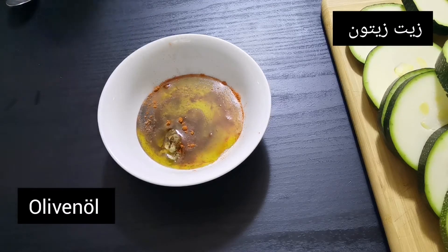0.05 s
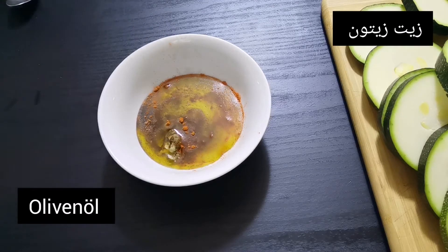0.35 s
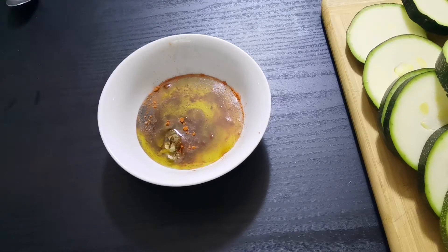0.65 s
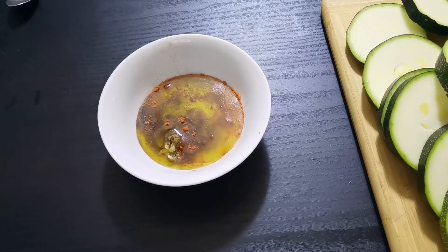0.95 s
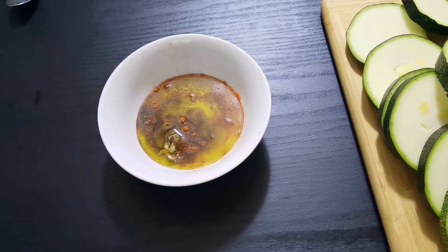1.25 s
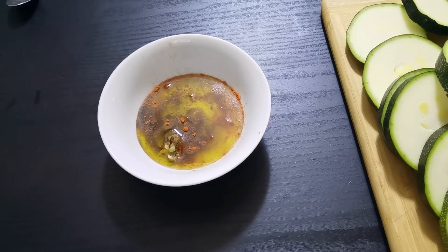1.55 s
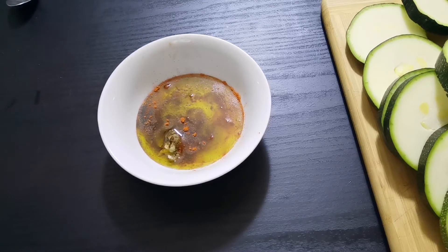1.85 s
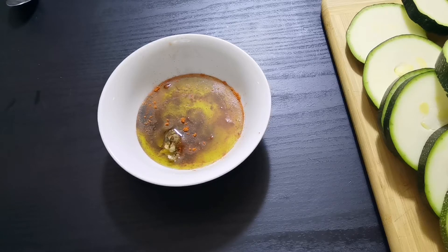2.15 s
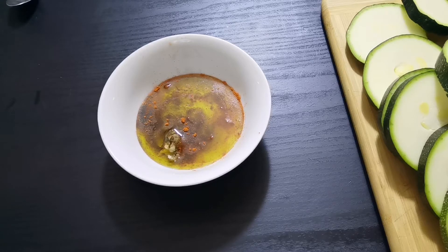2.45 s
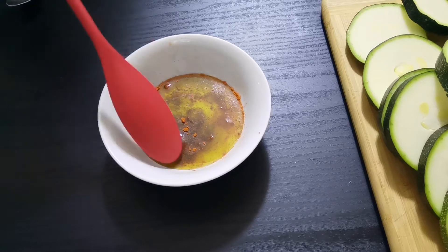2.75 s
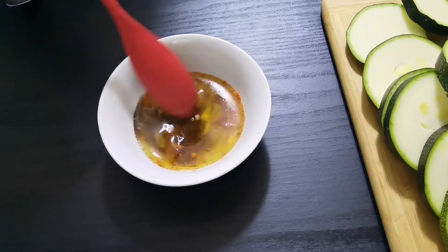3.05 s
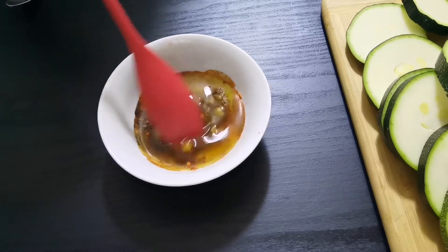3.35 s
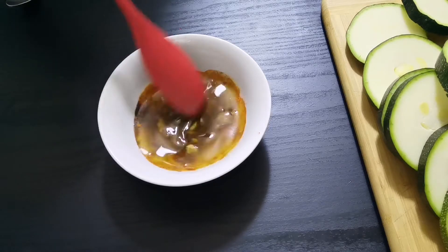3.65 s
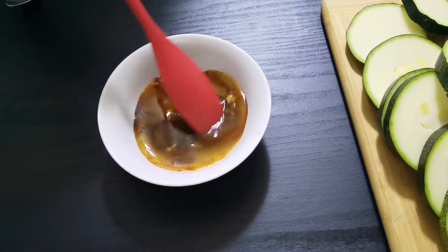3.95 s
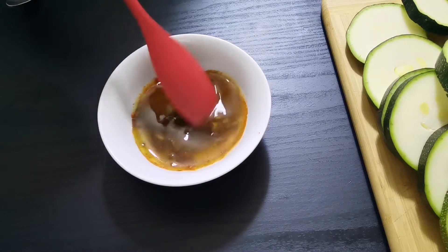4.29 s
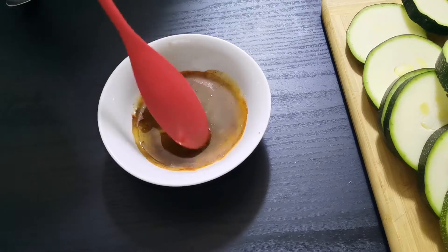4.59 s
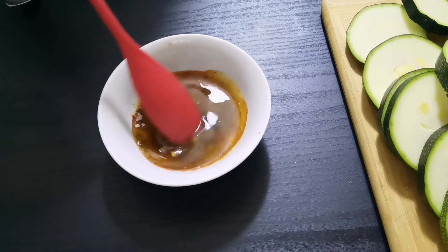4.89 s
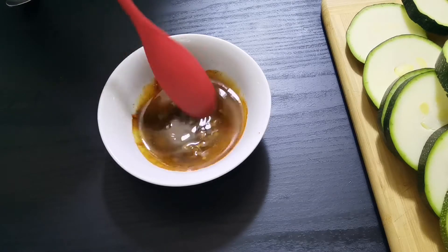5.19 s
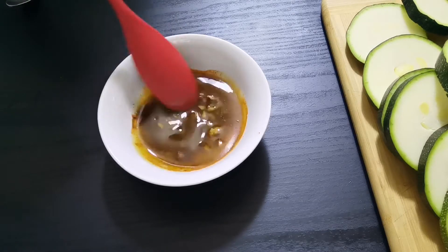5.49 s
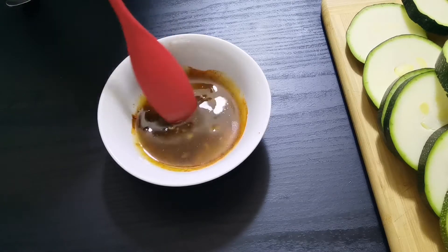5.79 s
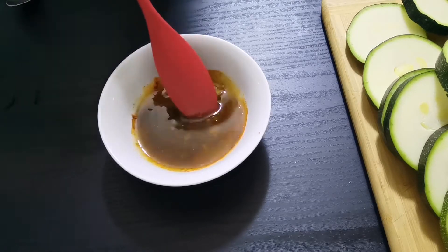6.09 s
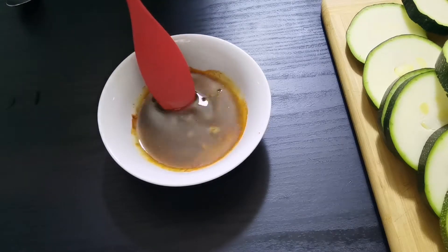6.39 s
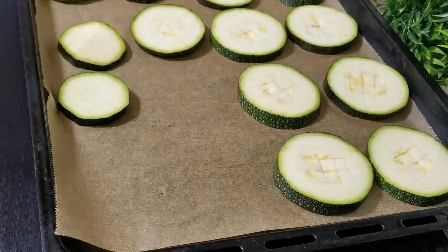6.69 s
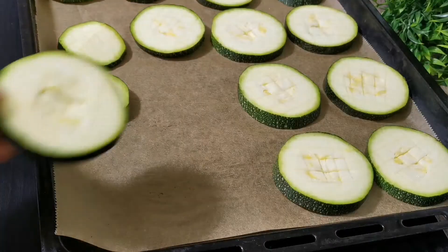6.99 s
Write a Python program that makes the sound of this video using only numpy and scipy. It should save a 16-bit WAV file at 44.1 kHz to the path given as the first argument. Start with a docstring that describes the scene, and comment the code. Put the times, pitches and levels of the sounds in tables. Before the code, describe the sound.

A plastic jar lid snaps and the jar thuds onto a wooden table, then a spatula stirs oil and spices in a ceramic bowl.

```python
"""A small, quiet kitchen, a stereo microphone close to a wooden table. First a spice jar's plastic lid
snaps shut. At 1.3 s the jar is set down and the table rings; at 1.8 s something is slid aside, sticking
and slipping. From 2.9 s to 6.4 s a silicone spatula stirs oil and spices in a ceramic bowl: grit scrapes
the glaze, air pockets smack and pop in the oil, and each push rumbles through the table. At 6.6 s the
sound drops out briefly and returns with a soft bump on the left."""
import sys
import numpy as np
from scipy import signal
from scipy.fft import rfft, irfft
from scipy.io import wavfile

SR = 44100
rng = np.random.default_rng(int(sys.argv[2]) if len(sys.argv) > 2 else 0)


def materialize(psi):
    """Save the field psi as 16-bit PCM at rate SR to the path in sys.argv[1].

    A 1-D psi becomes a single channel; in a 2-D psi each row is a channel.
    """
    bounded = np.clip(np.atleast_2d(psi).T, -1, 1)
    quanta = np.round(bounded * 32767).astype(np.int16)
    wavfile.write(sys.argv[1], SR, quanta)


N = 310148
T = np.arange(N) / SR
SHORT = T[:SR // 2]  # time axis of one short event


# strokes of the spatula: (start [s], length [s], push level [dB], scrape level [dB])
STROKES = [(2.86, 0.14, -60.5, -69.5), (3.08, 0.14, -54.5, -63.5), (3.345, 0.12, -54.5, -62.5),
           (3.515, 0.069, -57.5, -63.5), (3.635, .1, -59.5, -64.5), (3.8, 0.14, -56.5, -66.5),
           (3.95, .17, -52.5, -61.5), (4.155, .11, -51.5, -64), (4.295, 0.079, -50, -60),
           (4.415, 0.078, -54.5, -60), (4.712, 0.034, -52.5, -63.5), (4.835, 0.092, -50, -60),
           (4.96, 0.052, -56, -62), (5.07, 0.12, -53, -60.5), (5.205, 0.13, -47.5, -60.5),
           (5.385, 0.039, -47.5, -55), (5.465, 0.091, -52, -60.5), (5.575, 0.1, -53, -61.5),
           (5.69, 0.17, -51, -63), (5.865, 0.082, -58.5, -65.5), (5.99, .04, -65, -76),
           (6.05, .105, -54.5, -66.5), (6.175, 0.033, -57, -66), (6.24, .065, -51.5, -67.5),
           (6.34, 0.057, -55.5, -68.5)]
# the blade drags oil along between strokes: (start [s], stop [s], push level [dB], scrape level [dB])
DRAGS = [(2.87, 4.46, -65, -75), (4.72, 5.92, -59, -70), (6.06, 6.42, -64, -75.5)]


def spatula():
    """Strength of push, scrape and grit: over a light drag each stroke digs in, sags and lets go."""
    attack_s, sag_db_per_s = 0.021, 10
    push_release_s, scrape_release_s = 0.039, 0.026  # the oil moves on after the scrape has ended
    push, scrape = np.zeros(N), np.zeros(N)
    for start_s, stop_s, push_db, scrape_db in DRAGS:
        push += amp(push_db) * gesture(start_s, stop_s, attack_s, push_release_s)
        scrape += amp(scrape_db) * gesture(start_s, stop_s, attack_s, scrape_release_s)
    for s, length_s, push_db, scrape_db in STROKES:
        stop_s = s + length_s
        sag = amp(-sag_db_per_s * np.clip(T - s, 0, length_s))
        push = np.maximum(push, amp(push_db) * sag * gesture(s, stop_s, attack_s, push_release_s))
        scrape = np.maximum(scrape, amp(scrape_db) * sag * gesture(s, stop_s, attack_s, scrape_release_s))
    soaked = np.interp(T, [STROKES[0][0], 6.56], [0, 1]) ** 2.1
    grit = scrape * amp(-3.5 - 9.5 * soaked)  # the grit fades as the spices soak
    return push, scrape, grit


# bowl and table shaken by the blade: (frequency [Hz], level [dB])
PUSH_SPECTRUM = [(35, -61.5), (60, -29.5), (108, 3.5), (151, -3.5), (233, 1.5), (283, -10.5), (322, 3.5),
                 (355, -12), (413, -4.5), (460, -16), (710, -12.5), (800, -22.5), (1040, -44.5),
                 (1760, -120)]
# spices rasping on the glaze: (frequency [Hz], level [dB])
SCRAPE_SPECTRUM = [(290, -38.5), (500, -3.5), (719, -8), (868, -7), (1010, 1), (1140, -8.5), (1340, 3),
                   (1760, -21.5), (2060, 6), (2900, -9.5), (3180, -5.5), (6000, -48.5), (7800, -60),
                   (13200, -120)]
# the fizz of fine grit: (frequency [Hz], level [dB])
GRIT_SPECTRUM = [(2400, -23), (3800, -5), (4800, 1), (6200, -8), (8000, -2), (9300, -14), (11000, -9),
                 (13000, -25), (15500, -26)]


def stirring(push, scrape, grit):
    """Spices catch under the blade in spurts, the oil squelches, the drag shakes bowl and table."""
    spurts = amp(3.26 * walk(70))
    catches = grains(1100, 3.7) * spurts
    fine = grains(4000, 1.8) * spurts
    rumble = amp(-3) * push * unit(colour(grains(1500, 1.6) * spurts, PUSH_SPECTRUM))
    glugs = amp(-7) * squelch(push, per_s=40, low_hz=149.3, high_hz=373, cycles=2.4, spread_db=9.5)
    rasp = amp(1) * scrape * unit(bowl(colour(catches, SCRAPE_SPECTRUM)))
    pops = squelch(scrape, per_s=180, low_hz=1137, high_hz=3880, cycles=2.34, spread_db=13)
    fizz = amp(2) * grit * unit(bowl(colour(unit(catches) + 0.98 * unit(fine), GRIT_SPECTRUM)))
    hard_push = push * np.sqrt(push / amp(-51.5))  # from about this level on, thick oil plops loudly
    plops = amp(-4) * squelch(hard_push, per_s=90, low_hz=449, high_hz=1098, cycles=2.26, spread_db=9)
    return rumble + glugs + plops, rasp + amp(-2) * bowl(pops) + fizz


def squelch(level, per_s, low_hz, high_hz, cycles, spread_db):
    """Air pockets of many sizes open in the oil, as loud as the stirring is strong."""
    out = np.zeros(N)
    for when, pitch, strength, length in rng.random((int(per_s * N / SR), 4)):
        s = when * N / SR
        drive = level[int(s * SR)]
        if drive > 0:
            hz = low_hz * (high_hz / low_hz) ** pitch
            pocket = bubble(hz, cycles * (0.5 + length), rise=0.13, size=SR // 10)
            add(out, s, pocket, 20 * np.log10(drive) + spread_db * strength ** 2)
    return out


def bubble(hz, cycles, rise, size=len(SHORT)):
    """An air pocket rings for a few cycles and rises in pitch as it opens."""
    age = SHORT[:size] * hz / cycles
    glide = 1 + rise * (1 - np.exp(-age))
    return np.sin(2 * np.pi * hz * np.cumsum(glide) / SR) * np.exp(-age)


# loud smacks of oil off the blade: (time [s], level [dB], pitch [Hz], relative treble [dB])
SMACKS = [(2.9531, -49, 2150, -19), (2.9886, -45, 2200, -6), (3.1061, -37.5, 2100, -10),
          (3.1531, -37.5, 2270, -31), (3.1887, -41.5, 2120, -16), (3.242, -42, 2620, -26),
          (3.3645, -30.5, 2450, -7.5), (3.4171, -40, 2080, -19), (3.644, -39.5, 2140, -32),
          (3.715, -41.5, 2540, -19), (3.8334, -42, 2070, -14), (3.879, -38.5, 3420, -22),
          (3.963, -40, 2300, -30), (4.0326, -39.5, 2080, -28), (4.089, -39.5, 1920, -30),
          (4.2126, -41.5, 2230, -35), (4.3365, -38.5, 2040, -20), (4.4064, -36, 2090, -10),
          (4.7161, -27.5, 3080, -4), (4.8556, -34, 3220, -1.5), (4.8995, -35, 2050, -6),
          (5.0158, -38.5, 3200, -4.5), (5.0873, -36, 2090, -2), (5.1108, -32, 2100, -29),
          (5.2474, -32, 2010, -7), (5.3004, -38.5, 2090, -30), (5.4051, -38, 2000, 2),
          (5.4211, -34.5, 2070, -16), (5.8277, -38.5, 2160, -24), (6.0591, -48, 2790, -13.5),
          (6.182, -44, 2180, -11.5), (6.3175, -47, 2070, -9.5)]
# the tearing oil film: (frequency [Hz], level [dB])
TEAR_SPECTRUM = [(200, -26.5), (500, 10), (1000, -8), (2200, 5), (3400, 6), (4500, -8), (6500, -4.5),
                 (9000, -19), (15000, -35)]


def smacks(scrape):
    """The oil film tears with a crackle and the air pocket behind it rings."""
    out = np.zeros(N)
    for s, db, hz, treble_db in SMACKS + lesser_smacks(scrape):
        tear = crack(0.0053, share=0.39)
        film = unit(colour(tear, TEAR_SPECTRUM))
        pocket = 1.01 * unit(bubble(hz, cycles=5.9, rise=0.023))
        treble = amp(treble_db + 5.5) * unit(colour(tear, GRIT_SPECTRUM))
        add(out, s, bowl(film + pocket + treble), db)
    return out


def lesser_smacks(scrape, per_s=13, over_scrape_db=18, scatter_db=2.5, scatter_octaves=0.2):
    """Chance smacks that follow the strength of the scraping, as rows like those of SMACKS."""
    rows = []
    for when, strength, pitch in rng.uniform(-1, 1, (int(per_s * N / SR), 3)):
        i = int(abs(when) * (N - 1))
        if scrape[i] > 0:
            db = 20 * np.log10(scrape[i]) + over_scrape_db + scatter_db * strength
            rows.append((i / SR, db, 2206 * 2 ** (scatter_octaves * pitch), -17))
    return rows


# the blade squeezes oil out: (time [s], level [dB], half length [s])
SQUISHES = [(3.839, -53, 0.007), (3.886, -51, 0.007), (4.368, -58.5, .016), (4.742, -58.5, 0.018),
            (5.12, -42.5, 0.009), (5.244, -47, 0.013), (5.374, -49, 0.016), (5.652, -54.5, 0.018)]
# the crackle of squeezed oil: (frequency [Hz], level [dB])
SQUISH_SPECTRUM = [(600, -10), (1500, -5), (2200, -1.5), (3500, -2.5), (5000, -1), (8000, -5.5),
                   (11000, -14), (15000, -26)]


def squishes():
    """Oil squeezed under the blade bursts into a dense, bright crackle."""
    squeeze = sum(amp(db) * np.exp(-np.abs((T - s) / half_s) ** 0.98) for s, db, half_s in SQUISHES)
    bursts = grains(3000, 2.2) * amp(3.6 * walk(300))
    return squeeze * unit(bowl(colour(bursts, SQUISH_SPECTRUM)))


# resonances of the bowl: (frequency [Hz], width [Hz], level [dB])
BOWL_RESONANCES = [(994, 113, -2), (1333, 14, -1), (1568, 28, 4.5), (2008, 60, -3.5), (2640, 180, -5),
                   (3410, 210, -4), (7940, 200, -13)]


def bowl(x):
    """The ceramic bowl lifts its own resonances out of whatever touches it."""
    return x + sum(amp(db) * band(x, hz, width) for hz, width, db in BOWL_RESONANCES)


# the blade knocks on bare glaze: (time [s], level [dB])
TAPS = [(3.153, -71), (3.365, -61), (3.65, -55.5), (3.991, -54), (4.09, -56.5), (4.449, -66),
        (4.716, -53.5), (5.11, -49), (5.412, -61)]
# modes of the struck bowl: (frequency [Hz], level [dB], t60 [s])
BOWL_MODES = [(1333, -3.5, 0.2), (2060, -11.5, 0.2)]


def taps():
    """Each knock sounds the bowl's own note, damped by the oil in it."""
    out = np.zeros(N)
    for s, db in TAPS:
        add(out, s, above(ring(BOWL_MODES), 900), db)
    return out


def squeak():
    """The resting blade creeps on the glaze with a faint whistle."""
    whistle = band(band(rng.standard_normal(N), 3700, 140), 3700, 140)
    return amp(-76) * swell(4.603, 0.031) * unit(whistle)


# fingers bump the jar, later the spatula bumps the bowl: (time [s], relative level [dB], pitch [Hz])
BUMPS = [(0.347, -44, 182), (0.378, -36.5, 189), (1.937, -33.5, 215), (1.972, -45, 115),
         (2.874, -45, 129.4), (3.186, -43.5, 264), (3.878, -42.5, 210), (4.096, -39.5, 236),
         (4.334, -34.5, 217), (4.894, -40, 274), (5.415, -44, 328), (5.715, -43.5, 322),
         (6.261, -46.5, 303)]


def bumps():
    """Soft pushes: a few low cycles that swell and die."""
    out = np.zeros(N)
    for s, db, hz in BUMPS:
        add(out, s, np.sin(2 * np.pi * hz * SHORT) * SHORT * np.exp(-SHORT / 0.0057), db - 4.5)
    return out


# snaps of the lid:
# (time [s], level [dB], pitch [Hz], relative ring level [dB], chatter decay [s], treble [dB])
SNAPS = [(0.2123, -28, 2920, 13.5, 0.00028, -2), (0.223, -40.5, 2780, 4, 0.045, 2.5),
         (.254, -39, 2200, 2.5, 0.019, 5.5), (.366, -33.5, 3500, -32, 0.02, -0.5),
         (.3775, -27, 1920, -6.5, 0.013, 9.5), (.383, -35.5, 990, -15, 0.0049, 18),
         (.538, -48, 4540, -3, 0.0052, 17.5), (.594, -58, 2080, 2, 0.012, -18),
         (.678, -25, 2980, -4, 0.0056, 2), (.683, -29.5, 4000, -5.5, 0.0017, -23),
         (.779, -44.5, 3030, -32, 0.0033, -2), (1.526, -61.5, 7000, -15, 0.035, 15),
         (1.9332, -31, 2960, -37, 0.0041, 8.5)]
# the body of lid and jar: (frequency [Hz], level [dB])
JAR_SPECTRUM = [(200, -24.5), (350, -15), (650, -18.5), (950, -10), (1400, -11.5), (2070, -7), (3000, -8.5),
                (4100, -10), (6400, -22.5), (8000, -20.5), (10500, -30.5), (15500, -42)]
# fingers rub on the jar: (time [s], half length [s], rustle level [dB], hiss level [dB])
RUBS = [(.51, .03, -61.5, -69.5), (.61, 0.027, -63.5, -70), (.69, 0.037, -54.5, -65),
        (.77, 0.026, -69, -72), (.91, 0.054, -67.5, -64), (1.045, 0.027, -74, -77.5),
        (1.17, .025, -78, -80.5), (1.7, 0.018, -73.5, -77), (2.43, 0.045, -79.5, -73.5),
        (2.52, 0.027, -78.5, -75)]


def jar_lid():
    """The plastic lid snaps, each time with a short ring, and fingers rustle on the jar."""
    out = np.zeros(N)
    for s, db, hz, ring_db, chatter_s, treble_db in SNAPS:
        snap = colour(crack(chatter_s, share=0.38), JAR_SPECTRUM)
        ringing = amp(ring_db + 11.5) * band(snap, hz, 460)
        add(out, s, colour(snap, [(3500, 0), (6500, treble_db)]) + ringing, db)
    skin = colour(grains(2500, 3.2) * amp(3.2 * walk(46)), JAR_SPECTRUM)
    rustle = unit(skin + 1.1 * band(skin, 2070, 60))
    hiss = unit(above(skin, 7200))
    for s, half_s, rustle_db, hiss_db in RUBS:
        out += swell(s, half_s) * (amp(rustle_db) * rustle + amp(hiss_db) * hiss)
    return out


def groan():
    """The jar groans low while the lid is being forced."""
    drag = unit(band(band(grains(900, 1.9), 210, 45), 195, 90))
    return amp(-60) * swell(0.275, 0.033) * drag


# the jar's weight comes down on the table: (time [s], level [dB], contact time [s])
BLOWS = [(1.3314, -25.5, .0016), (1.333, -11.5, 0.0023), (1.3375, -13, 0.0028), (1.3542, -23, 0.0026),
         (1.3928, -31.5, 0.0037)]
# modes of the wooden table: (frequency [Hz], level [dB], t60 [s])
TABLE_MODES = [(64, -24, 0.32), (102, 2, 0.3), (149, -6.5, .15), (199, -10, .13), (263.5, -8, 0.24),
               (317, 8, 0.22), (380, -14, 0.24), (470, -18, 0.2), (550, -15, 0.24)]


def table_thud():
    """The jar lands, settles and rocks back; the soft contacts excite the low table modes."""
    force = np.zeros(N)
    for s, db, contact_s in BLOWS:
        contact = swell(s, contact_s / 2.5)
        force += amp(db) * contact / contact.sum()
    return above(signal.fftconvolve(force, ring(TABLE_MODES))[:N], 96)


def table_top(thud, grip_s=1.47, fade_s=0.19):
    """The higher table modes reach the microphone mostly on the left; the hand's weight ends the ring."""
    held = thud * np.exp(-np.maximum(T - grip_s, 0) / fade_s)
    side = 0.35 * band(held, 370, 190) * np.array([[1], [-1]])
    return place(held, left_db=2, near_db=-16.5, room_db=-17.5) + side


# modes of the jar's base: (frequency [Hz], level [dB], t60 [s])
BASE_MODES = [(290, 3.5, 0.0085), (683, -14.5, .09), (859, -12.5, 0.11), (1040, -7.5, 0.098),
              (1340, 0.5, 0.067), (1681, -12.5, .06)]


def jar_clack(edge_s=1.3277):
    """The jar's edge touches the table first: its base rings and the contents rattle."""
    base = colour(ring(BASE_MODES),
                  [(120, -8), (300, 3), (1800, 0), (3500, -11.5), (8000, -24), (14000, -38)])
    rattle = colour(crack(0.027, share=0.6), [(200, -4.5), (550, 3.5), (1100, 3), (2000, -14.5),
                                              (5000, -21.5), (8500, -26), (14000, -52.5)])
    out = np.zeros(N)
    add(out, edge_s, -base, db=-29)
    add(out, edge_s, rattle, db=-32)
    return out


# slow rubbing on wood: (frequency [Hz], level [dB])
SLOW_RUB_SPECTRUM = [(300, -9), (500, 0), (620, -2.5), (800, 0.5), (1150, 0), (1600, -8.5), (2200, -22.5),
                     (4500, -23), (8000, -59)]
# fast rubbing on wood: (frequency [Hz], level [dB])
FAST_RUB_SPECTRUM = [(400, -16.5), (800, -4.5), (1400, 2), (2100, -4.5), (2450, -10), (2780, -4.5),
                     (3100, -7), (4500, -11.5), (8000, -37.5)]
# the hiss of the wood grain: (frequency [Hz], level [dB])
HISS_SPECTRUM = [(2000, -24), (3600, 5.5), (5200, 1), (6300, -12), (8100, -1), (9600, -21.5), (11500, -14),
                 (15000, -43)]


def slide(start_s=1.772, free_s=1.813, stop_s=2.2185, attack_s=0.12, release_s=0.012):
    """Stick-slip shakes the table; the object breaks free and its rub brightens as it gathers speed."""
    speed = np.interp(T, [free_s, stop_s], [0, 1])
    dragging = gesture(start_s, stop_s, attack_s, release_s) * amp(2 * walk(35))  # an uneven drag
    gliding = gesture(free_s, stop_s, attack_s, release_s)
    slips = grains(3000, 2.5) * amp(2.2 * walk(110))
    wood = band(band(slips, 322, 52), 320, 340) + 0.067 * band(slips, 440, 124)
    bright_share = 0.78 * speed ** 1.8
    dull = np.sqrt(1 - bright_share) * unit(colour(slips, SLOW_RUB_SPECTRUM))
    bright = np.sqrt(bright_share) * unit(colour(slips, FAST_RUB_SPECTRUM))
    judder = amp(-49 - 5 * speed) * unit(wood)
    rub = amp(-58 + 7.5 * speed) * (dull + bright)
    hiss = amp(-62 - 4 * speed) * unit(colour(slips, HISS_SPECTRUM))
    return dragging * judder + gliding * (rub + hiss)


def place(x, left_db, near_db, room_db):
    """At the microphone: direct sound, and reflections that differ per side and shift as the hand moves."""
    direct = colour(x, [(300, 0.5), (700, -4), (2400, -0.5), (7000, -6)])
    sides = []
    for side in (1, -1):
        pose = 2 * np.pi * 1.4 * T + walk(5)
        echoes = np.cos(pose) * reflections(x, near_db, room_db)
        echoes += np.sin(pose) * reflections(x, near_db, room_db)
        sides.append(amp(side * left_db / 2) * (direct + echoes))
    return np.array(sides)


# what the surfaces around the microphone throw back: (frequency [Hz], level [dB])
ECHO_SPECTRUM = [(120, -14), (330, -2), (650, 3), (1400, 1), (2400, -2), (4400, 3.5), (7000, 1.5),
                 (15000, 1)]


def reflections(x, near_db, room_db):
    """Quick reflections from bowl and table top close by, then a short kitchen tail."""
    near = unit(rng.standard_normal(len(SHORT)) * np.exp(-SHORT / 0.0026) * (SHORT > 0.0003))
    tail = unit(rng.standard_normal(len(SHORT)) * np.exp(-SHORT / 0.035) * (SHORT > 0.007))
    tail = colour(tail, [(500, 0.5), (3000, -1.5), (8000, -4), (15000, -3.5)])
    echoes = colour(amp(near_db) * near + amp(room_db) * tail, ECHO_SPECTRUM) / np.sqrt(len(SHORT))
    return signal.fftconvolve(x, echoes)[:N]


# the quiet kitchen: (frequency [Hz], level [dB])
ROOM_SPECTRUM = [(15, -36.5), (25, -1), (152, -7), (188, -1.5), (240, -11.5), (322, -13), (359, -13.5),
                 (703, -22), (871, -20.5), (1110, -23.5), (1850, -26.5), (2300, -26.5), (15500, -41.5)]


def room_tone():
    """Faint room rumble shared by both sides of the microphone, with separate hiss."""
    mid, side = (unit(colour(rng.standard_normal(N), ROOM_SPECTRUM)) for _ in range(2))
    return amp(-72.5) * (mid + 1.3 * above(side, 360) * np.array([[1], [-1]]))


def gesture(start_s, stop_s, attack_s, release_s):
    """Envelope of one movement of the hand: smooth attack, hold, dying release."""
    rise = np.sin(np.pi / 2 * np.clip((T - start_s) / attack_s, 0, 1)) ** 2
    release = np.exp(-np.clip((T - stop_s) / release_s, 0, 20))
    return rise * release * (T < stop_s + 10 * release_s)


def swell(middle_s, half_s):
    """Bell-shaped envelope."""
    return np.exp(-((T - middle_s) / half_s) ** 2)


def walk(per_s):
    """Smooth random wandering with a spread near 1."""
    knots = rng.standard_normal(N // 20)
    return np.interp(T * per_s, np.arange(len(knots)), knots)


def grains(per_s, spread_db, size=N):
    """Random tiny clicks, a few much larger than the rest."""
    hit = rng.random(size) < per_s / SR
    strength = amp(spread_db * np.minimum(rng.exponential(size=size), 4))
    return hit * strength * rng.choice([-1, 1], size)


def crack(chatter_s, share):
    """A sharp break followed by a dying chatter of smaller ones."""
    x = share * grains(5000, 3.1, size=len(SHORT)) * np.exp(-SHORT / chatter_s)
    x[0] += 1
    return x


def ring(modes):
    """Impulse response of modes given as (frequency [Hz], level [dB], t60 [s])."""
    return sum(amp(db) * np.cos(2 * np.pi * hz * SHORT) * np.exp(-np.log(1000) * SHORT / t60)
               for hz, db, t60 in modes)


def colour(x, points):
    """Causal filter through (frequency [Hz], level [dB]) points, made from the cepstrum."""
    size = 8192
    hz, db = np.transpose(points)
    bins_hz = np.maximum(np.fft.rfftfreq(size, 1 / SR), 1)
    gain = amp(np.interp(np.log(bins_hz), np.log(hz), db))
    cepstrum = irfft(np.log(gain))
    cepstrum[1:size // 2] *= 2  # fold to minimum phase
    cepstrum[size // 2 + 1:] = 0
    return signal.fftconvolve(x, irfft(np.exp(rfft(cepstrum))))[:len(x)]


def band(x, hz, width_hz):
    """One resonance, gain 1 at its centre."""
    return signal.lfilter(*signal.iirpeak(hz, hz / width_hz, fs=SR), x)


def above(x, hz):
    """Gentle high-pass."""
    return signal.sosfilt(signal.butter(2, hz, "high", fs=SR, output="sos"), x)


def add(track, s, sound, db):
    """Put a sound into the track with its peak at db."""
    i = int(s * SR)
    track[i:i + len(sound)] += (amp(db) * sound / np.abs(sound).max())[:N - i]


def amp(db):
    """Decibels to gain."""
    return 10 ** (np.asarray(db) / 20)


def unit(x):
    """Scale to rms 1."""
    return x / np.sqrt(np.mean(x ** 2))


def scene():
    """The table from close up: the bowl almost straight ahead, the jar and the slide to the left."""
    push, scrape, grit = spatula()
    rumble, scraping = stirring(push, scrape, grit)
    clack = jar_clack()
    in_bowl = scraping + smacks(scrape) + squishes() + taps() + squeak()
    return (place(amp(-1.5) * jar_lid() + groan(), left_db=6.6, near_db=1.5, room_db=-4.5)
            + table_top(table_thud())
            + place(clack, left_db=6, near_db=-0.5, room_db=-8.5)
            + place(slide(), left_db=3.7, near_db=1.9, room_db=-7.5)
            + place(rumble + bumps(), left_db=3.7, near_db=-3.6, room_db=-5.5)
            + place(in_bowl, left_db=1, near_db=-2.5, room_db=-7)
            + room_tone())


def record(dry):
    """The sound drops out briefly and returns with a soft bump on the left; the top is cut steeply."""
    drop_s, return_s, top_hz = 6.618, 6.708, 15750
    live = (T < drop_s) | (T > return_s)
    since = np.maximum(T - return_s, 0)
    bump = amp(-37.5) * (np.exp(-since / 0.0031) - np.exp(-since / 0.076)) * np.array([[1], [0]])
    low_pass = signal.ellip(10, 0.1, 80, top_hz, fs=SR, output="sos")
    return signal.sosfilt(low_pass, dry * live + bump)


dry = scene()
out = record(dry)
materialize(out)
```